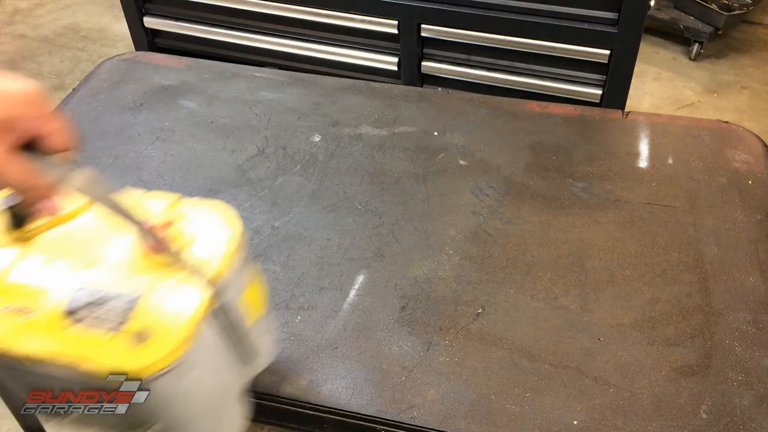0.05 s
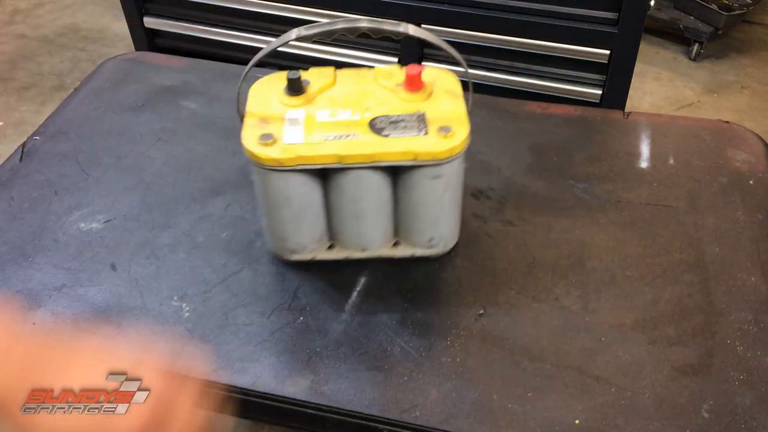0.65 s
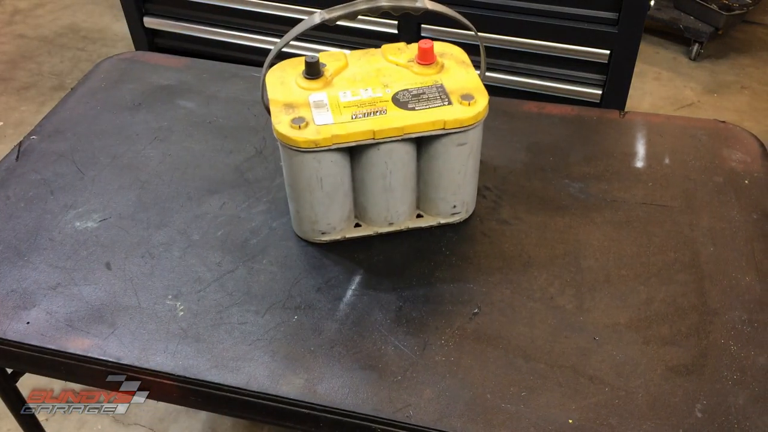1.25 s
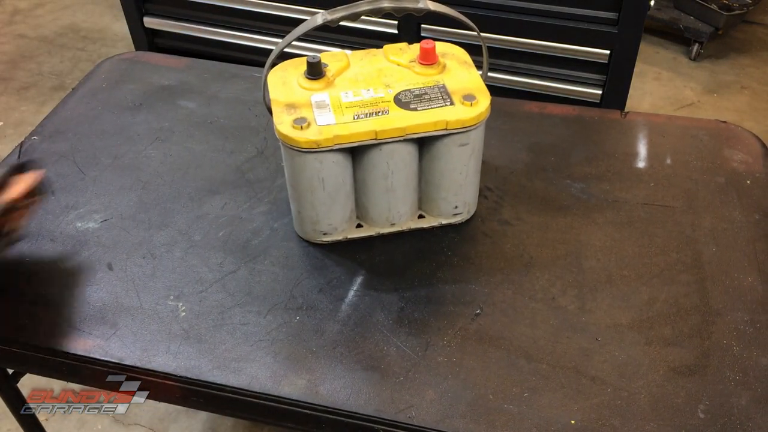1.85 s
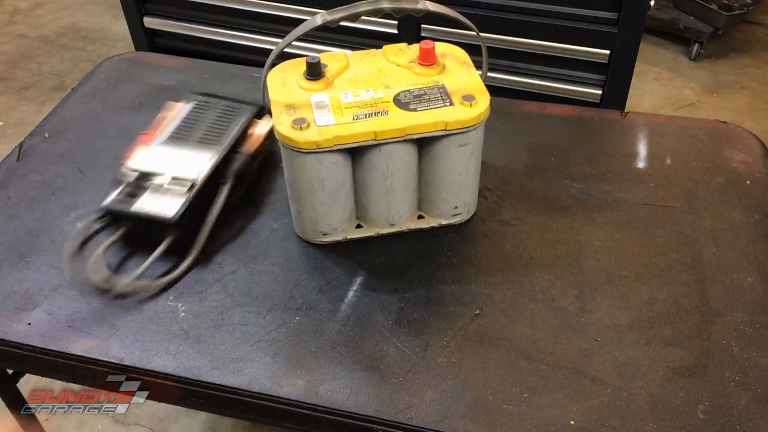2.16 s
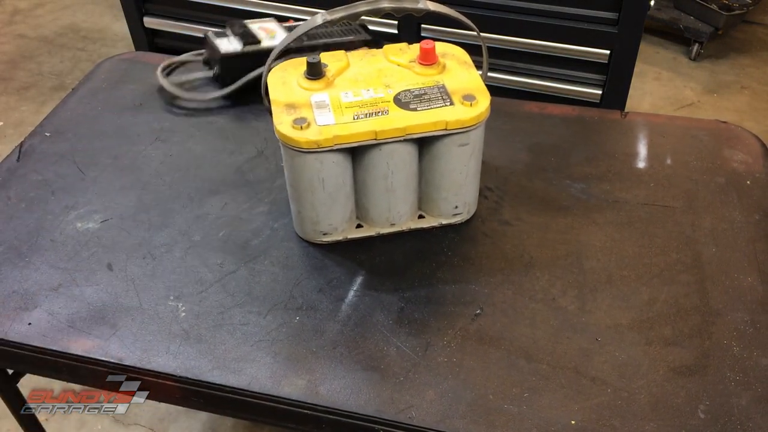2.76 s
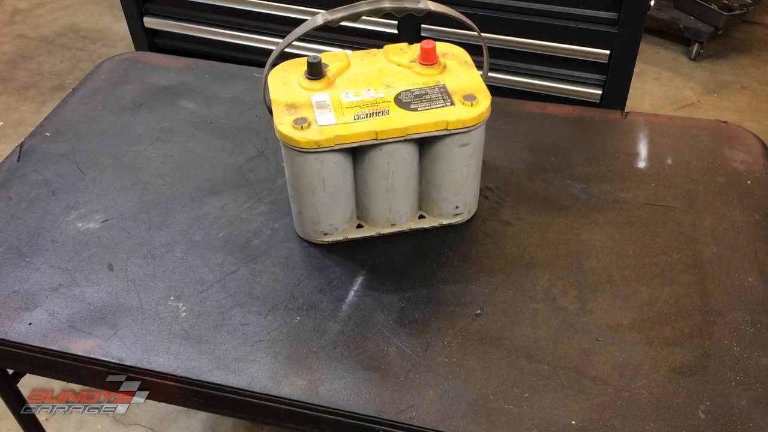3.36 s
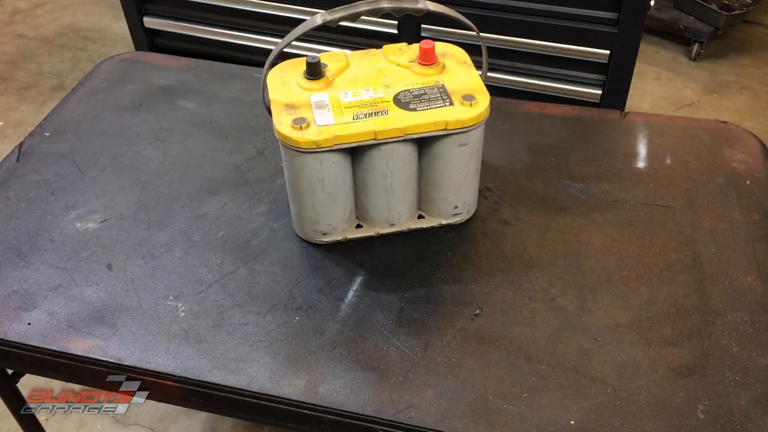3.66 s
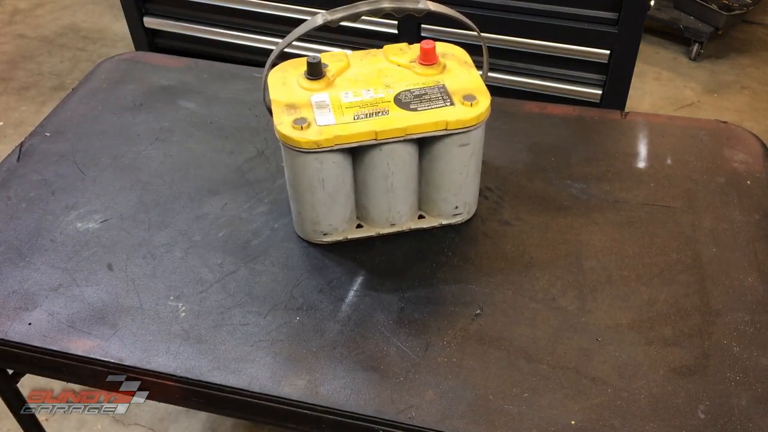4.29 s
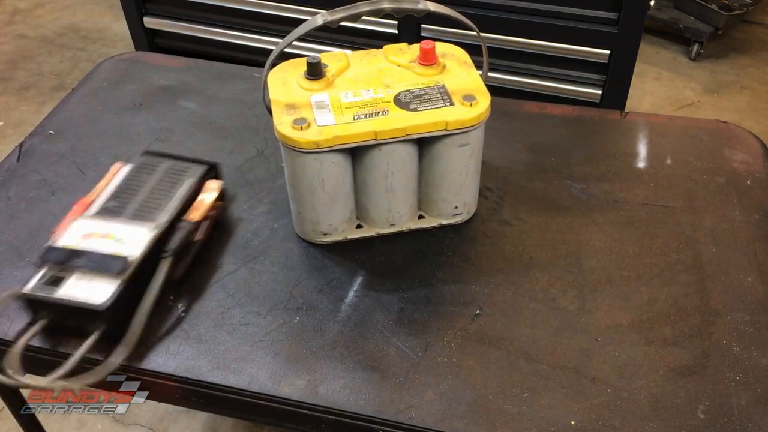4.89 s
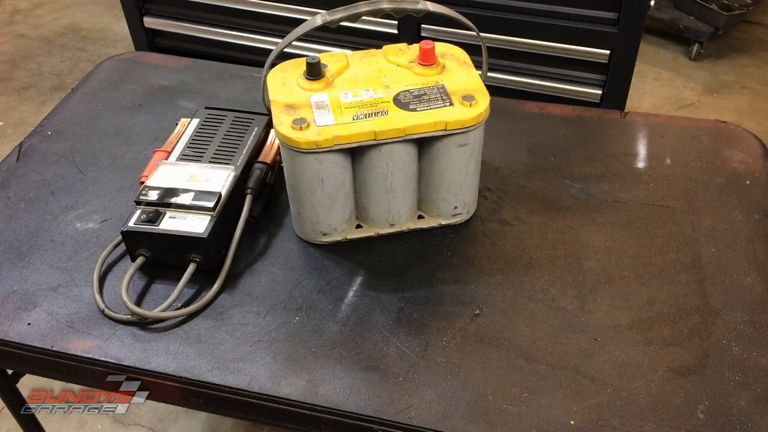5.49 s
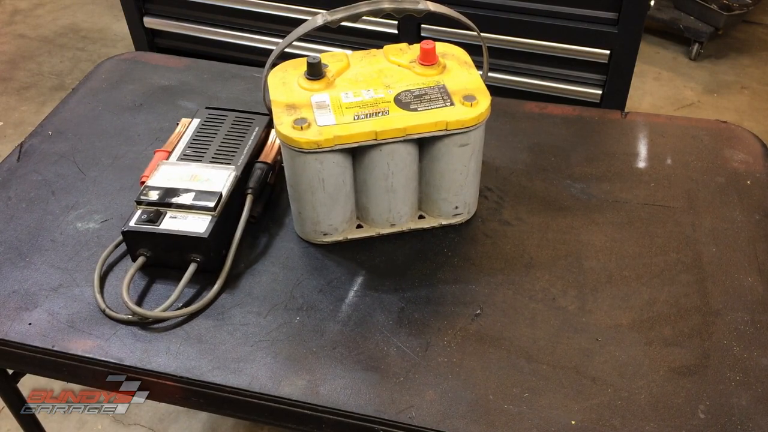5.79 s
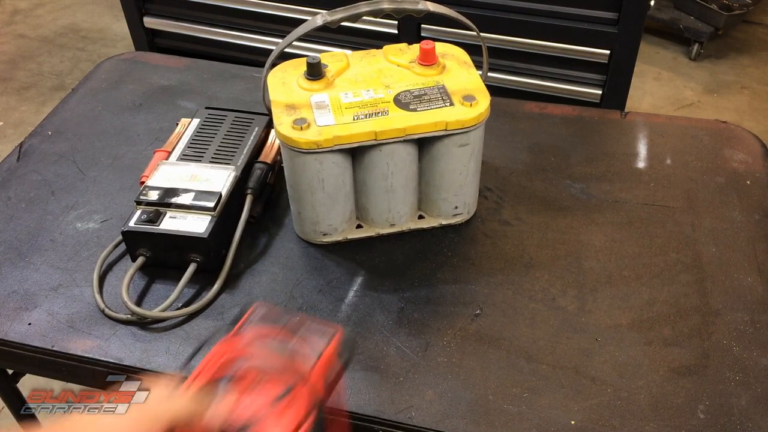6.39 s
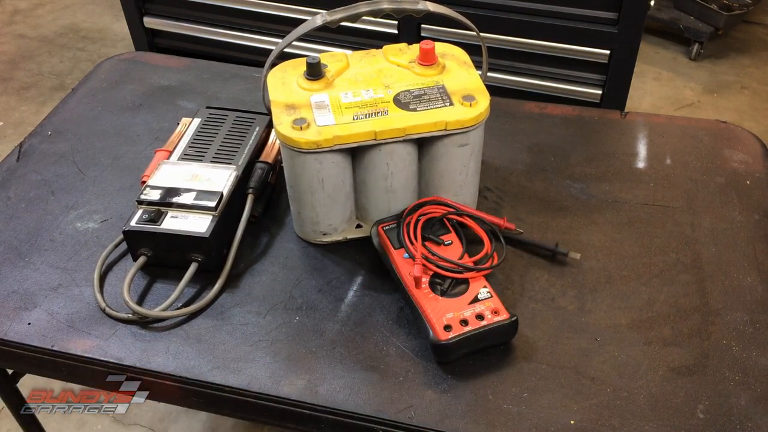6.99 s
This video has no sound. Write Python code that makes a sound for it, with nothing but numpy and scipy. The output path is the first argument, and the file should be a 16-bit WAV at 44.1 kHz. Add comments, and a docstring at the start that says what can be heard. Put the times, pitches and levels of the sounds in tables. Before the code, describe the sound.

A car battery thuds onto a steel table, a metal tester skids off and crashes onto concrete, then more tools clunk down.

```python
"""A car battery is dumped on a steel table in a garage, where it rocks and scrapes to rest.
A sheet-metal battery tester is thrown after it, skids over the edge and crashes on the concrete floor.
The tester lands on the table again, then a rubber-cased multimeter. Hits ring the steel top and frame
and click in the cases; slides judder by stick-slip. Sleeve and leads swish over faint room air.
The near microphone is driven to its limit."""
import sys
import numpy as np
from scipy import signal
from scipy.fft import rfft, irfft, next_fast_len
from scipy.io import wavfile

SR = 44100
rng = np.random.default_rng(int(sys.argv[2]) if len(sys.argv) > 2 else 0)


def store_wav(level_fs):
    """Save 16-bit WAV to argv[1]."""
    pcm = np.round(np.clip(np.atleast_2d(level_fs), -1, 1) * 32767)
    wavfile.write(sys.argv[1], SR, pcm.T.astype(np.int16))


N = 314874
AGE_S = np.arange(3 * SR // 2) / SR  # time since a hit

# Table contacts; flat landings shake the frame, corners do not: start_s, object, strength_db, flatness_db
TABLE_HITS = [ (0.246, "battery", -15.5, 6), (0.283, "battery", -12, -10.5), (0.299, "battery", -9.5, 1.5),
              (0.393, "battery", -22, -4.5), (0.455, "battery", -14, 6), (0.544, "battery", -19.5, 5.5),
              (0.588, "battery", -14, 1.5), (0.673, "battery", -18.5, 3.5), (0.725, "battery", -15, 5),
              (0.822, "battery", -16, 1.5), (1.073, "battery", -27.5, 2.5), (1.173, "battery", -27.5, 7),
              (1.354, "battery", -50, 10.5), (1.637, "battery", -49, -4), (2.061, "tester", -8, 8),
              (2.103, "tester", -1, -6), (2.261, "tester", -9.5, 0.5), (2.337, "tester", -17, -0.5),
              (2.381, "tester", -15, 8.5), (2.713, "tester", -27.5, 7.5), (2.873, "tester", -34, 11),
              (3.001, "tester", -35, 6), (4.821, "tester", -12, 4.5), (4.878, "tester", -4.5, -3.5),
              (4.890, "tester", -6, 0.5), (4.939, "tester", -17.5, 11.5), (5.034, "tester", -19.5, 6.5),
              (5.307, "tester", -26, -36.5), (5.324, "tester", -33.5, 4), (5.880, "tester", -49.5, -1),
              (6.594, "meter", -24.5, -3), (6.676, "meter", -3, -6.5), (6.822, "meter", -21, -32),
              (6.838, "meter", -30, 14.5), (6.911, "meter", -20.5, -28), (7.004, "meter", -35, -43)]
# Tester and clamps on concrete: start_s, body_db, clash_db, boom_db
FLOOR_HITS = [(3.262,-8,-10,-19.5), (3.268,-3.5,-6.5,-11.5), (3.316,-4,-4.5,-24.5), (3.364,-9.5,-20,-22),
              (3.536,-17.5,-27,-31.5), (3.812,-38.5,-48.5,-51), (3.943,-17,-27,-57), (3.976,-6.5,-8,-31.5),
              (4.057,-12,-19,-61)]
# Slides on the top: start_s, length_s, judder_db, scrape_db
SLIDES = [(0.302, 0.82, -21, -33), (2.28, 0.79, -25.5, -43), (4.905, 0.46, -23, -41.5),
          (6.72, 0.36, -25, -47)]
# Battery handle and meter probes: start_s, level_db
TICKS = [(0.282, -31), (0.456, -22), (0.589, -24), (0.822, -32), (6.912, -33), (7.006, -40.5)]
# Arm swings: start_s, length_s, level_db
SWINGS = [(1.335, 0.114, -62.5), (1.523, 0.18, -67), (1.928, 0.12, -60), (4.58, 0.22, -47.5),
          (5.61, 0.354, -61.5), (6.05, 0.178, -60.5), (6.36, .3, -51)]
# Case click at full strength: object, level_db
CLICK_DB = {"battery": -19.5, "tester": -10.5, "meter": -17.5}

# Modes of whole table, steel top, tester shell with clamps, battery handle: pitch_hz, level_db, t60_s
TABLE_MODES = [(59.5, -5, 0.88), (57.3, -9, 0.62), (77.6, -14, 0.13), (89.3, -1.5, 0.61), (97.5, 0.5, 0.94),
               (103, -6, 0.32), (145.2, -12.5, 1.3), (166.5, -11.5, 0.75), (177.8, -9, 0.85),
               (240.2, -12.5, 0.31)]
TOP_MODES = [(307, -9, 1), (350, 1, 0.26), (416.2, 3, 0.54), (659, -6.5, 1), (816, -7, 0.71),
             (961, -3, .55), (1029, 0.5, 0.23), (1096, -11, 0.64), (1990, -12.5, 0.4)]
SHELL_MODES = [(7196, -4, .3), (7299, -4, .3), (7750, -5, .3), (8107, -2, .3), (8433, -5, .3),
               (8639, -2, .3), (9116, -5, .3), (10525, -3, .3), (11633, -6, .3)]
HANDLE_MODES = [(4170, -11, 1.0), (4240, -11, 1.0), (4312, -11, 1.0), (4800, -2, .25), (5570, -11, .7),
                (5650, -11, .7)]

# Knock spectrum of each object on the top: freq_hz, density_db
BATTERY = [(60, -28.5), (150, -2.5), (340, 2), (500, 0.5), (750, -2), (930, 0.5), (1090, -3.5),
           (1300, -9.5), (1900, -15), (2600, -23.5), (5000, -26.5), (9000, -28), (16000, -56)]
TESTER = [(60, -25.5), (160, 2.5), (400, 0), (480, 0.5), (680, 3), (1060, -0.5), (1400, -8), (1900, -10.5),
          (2500, -20.5), (3300, -19), (5000, -31), (9000, -36.5), (16000, -57)]
METER = [(60, -29.5), (170, 12), (270, -8), (410, 5.5), (560, 2), (850, 2.5), (1100, 3), (1400, -4.5),
         (2000, -14), (3400, -21), (5000, -32.5), (9000, -26), (16000, -48.5)]
# Lookup: object, spectrum
KNOCK_SPECTRA = {"battery": BATTERY, "tester": TESTER, "meter": METER}

# Noise spectra: freq_hz, density_db
FRAME_SPECTRUM = [(5, -56.5), (22, -15.5), (40, -10), (60, 3), (90, -0.5), (125, -5), (170, -5.5),
                  (230, -12.5), (320, -14), (500, -30.5), (1500, -68)]
TOP_SPECTRUM = [(60, -20), (150, 3.5), (380, 10.5), (520, 13.5), (750, 7), (1080, -0.5), (1400, 2.5),
                (1900, -6.5), (2500, -19), (3400, -26), (5000, -33), (9000, -31.5), (16000, -59)]
CASE_SPECTRUM = [(500, -38.5), (2000, -4), (3300, -5.5), (5000, -8), (8300, 1), (10500, 0), (13000, -7),
                 (16000, -19.5)]
CRASH_BODY_SPECTRUM = [(25, -41.5), (100, -23), (220, -6.5), (400, 2), (650, 5), (1100, 0.5), (1400, -6),
                       (1700, -2), (2400, -12), (3500, -12), (5000, -15.5), (9000, -27.5), (16000, -43)]
CRASH_BOOM_SPECTRUM = [(5, -65), (25, -8.5), (60, -0.5), (120, -2), (210, 1.5), (320, -11), (600, -29.5),
                       (1500, -67.5)]
SCRAPE_SPECTRUM = [(800, -5), (2500, 5.5), (5000, -8.5), (9000, 0.5), (11500, -7.5), (13500, -18),
                   (16000, -20.5)]
SWISH_SPECTRUM = [(180, -13), (300, -0.5), (800, -1), (1800, 1), (2500, -0.5), (3600, -2), (4500, -6.5),
                  (6700, -6.5), (10500, -1.5), (14000, -9), (16000, -21.5)]
AIR_SPECTRUM = [(20, 5), (70, -4.5), (200, -15.5), (1000, -29), (4000, -38), (12000, -34), (16000, -44)]

# Decay of steel plus garage, and of the garage alone: freq_hz, t60_s
STEEL_DECAY = [(60, 0.66), (200, 1), (700, 0.62), (1500, 0.73), (4000, 0.79), (9000, 0.38), (15000, 0.14)]
GARAGE_DECAY = [(60, 1), (200, 0.5), (700, 0.49), (1500, 0.49), (4000, 0.48), (9000, 0.31), (15000, 0.27)]


def table_hits():
    """Each contact rocks the frame, knocks on the steel top and clicks in the object's case."""
    out = np.zeros(N)
    frame, top = modes(TABLE_MODES), modes(TOP_MODES)
    contact = onset(tau_s=0.0012)
    for start_s, thing, strength_db, flatness_db in TABLE_HITS:
        thud_db = strength_db + flatness_db
        # Click grows faster than knock; flat landings muffle it.
        click_db = CLICK_DB[thing] + 1.415 * strength_db - 0.14 * flatness_db
        thud = amp(-10.5) * ring(frame, scatter_db=6.5)
        thud += amp(-10.5) * wash(FRAME_SPECTRUM, STEEL_DECAY) * (amp(-1) + fade(0.21))
        steel = wash(KNOCK_SPECTRA[thing], STEEL_DECAY) + amp(-14) * ring(top, scatter_db=6.5)
        knock = steel * (amp(-13) + amp(-8) * fade(0.22))  # ringing + direct sound
        click = wash(CASE_SPECTRUM, STEEL_DECAY)
        click *= amp(-11) + amp(-3) * fade(0.16) + amp(2) * fade(0.007)
        hit = amp(thud_db) * thud + amp(strength_db) * knock + amp(click_db) * click
        add(out, start_s, contact * hit)
    return out


def floor_hits():
    """The tester's shell crashes behind the table, heard mostly off the walls."""
    out = np.zeros(N)
    shell = modes(SHELL_MODES)
    reflections = onset(tau_s=0.004)
    for start_s, body_db, clash_db, boom_db in FLOOR_HITS:
        body = wash(CRASH_BODY_SPECTRUM, GARAGE_DECAY) * (amp(-8.5) + amp(-26.5) * fade(0.44))
        clash = wash(CASE_SPECTRUM, GARAGE_DECAY) * (amp(-9) + amp(-11.5) * fade(1.0))
        clash += amp(-24.5) * ring(shell, scatter_db=3)
        boom = amp(-6.5) * wash(CRASH_BOOM_SPECTRUM, GARAGE_DECAY)
        crash = amp(body_db) * body + amp(clash_db) * clash + amp(boom_db) * boom
        add(out, start_s, reflections * crash)
    return out


def slides():
    """Stick-slip shakes top and frame; grit scratches under the object."""
    judder, scrape = friction()
    slips = grains(rate_hz=240, spread_db=0.5)
    top_ir = wash(TOP_SPECTRUM, STEEL_DECAY) * fade(0.15)
    top_ir += amp(-13.5) * ring(modes(TOP_MODES), scatter_db=2) * fade(0.43)
    frame_ir = ring(modes(TABLE_MODES), scatter_db=-1) * fade(0.34)
    frame_ir += amp(-5) * wash(FRAME_SPECTRUM, STEEL_DECAY) * fade(0.12)
    contact = onset(tau_s=0.002)
    top, frame = [unit_rms(signal.fftconvolve(slips, contact * ir)[:N]) for ir in (top_ir, frame_ir)]
    grit = colour(grains(rate_hz=30000, spread_db=1), SCRAPE_SPECTRUM)
    return judder * (amp(-2.5) * top + amp(-4) * frame) + amp(-4.5) * scrape * grit


def friction():
    """Judder and scrape gains: both fall with speed as friction brakes the object evenly."""
    judder, scrape = np.zeros((2, N))
    for start_s, length_s, judder_db, scrape_db in SLIDES:
        speed = stroke(start_s, length_s, rise_s=0.01, fall_s=length_s)
        judder += amp(judder_db) * speed ** 1.11
        scrape += amp(scrape_db) * speed
    return judder, scrape


def ticks():
    """Plastic parts snap against their cases, too light to ring the table."""
    out = np.zeros(N)
    for start_s, level_db in TICKS:
        add(out, start_s, amp(level_db) * noise(CASE_SPECTRUM, len(AGE_S)) * fade(t60_s=0.013))
    return out


def handle(start_s=0.822):
    """The battery's carrying handle rings as it swings to its stop."""
    out = np.zeros(N)
    add(out, start_s, amp(-47) * ring(modes(HANDLE_MODES), scatter_db=2))
    return out


def swishes():
    """Sleeve and leads brush as the arm moves."""
    gain = sum(amp(level_db) * stroke(start_s, length_s, rise_s=0.043, fall_s=0.11)
               for start_s, length_s, level_db in SWINGS)
    return gain * noise(SWISH_SPECTRUM, N)


def room_air():
    """Still garage air: faint, steady, mostly low noise."""
    return amp(-58) * noise(AIR_SPECTRUM, N)


def modes(rows):
    """One decaying sine per mode, signs alternating."""
    return np.array([(-1) ** k * amp(level_db) * fade(t60_s) * np.sin(2 * np.pi * pitch_hz * AGE_S)
                     for k, (pitch_hz, level_db, t60_s) in enumerate(rows)])


def ring(sines, scatter_db):
    """Modes summed at random strengths, as each contact point excites them differently."""
    return amp(scatter_db * rng.standard_normal(len(sines))) @ sines


def wash(spectrum, decay):
    """Dense overlapping modes: noise with a decay time per band."""
    freq_hz, time_s, bands = signal.stft(noise(spectrum, len(AGE_S)), SR, nperseg=256)
    bands *= np.exp(-np.log(1000) * time_s / log_interp(decay, freq_hz)[:, None])
    return signal.istft(bands, SR, nperseg=256)[1][:len(AGE_S)]


def grains(rate_hz, spread_db):
    """Tiny random slips of uneven size."""
    slipping = rng.random(N) < rate_hz / SR
    return slipping * rng.standard_normal(N) * amp(spread_db * rng.standard_normal(N))


def noise(spectrum, samples):
    """Coloured noise, rms 1."""
    return colour(rng.standard_normal(samples), spectrum)


def colour(x, spectrum):
    """x shaped by a spectrum, rms 1."""
    size = next_fast_len(len(x))
    gain = amp(log_interp(spectrum, np.fft.rfftfreq(size, 1 / SR)))
    return unit_rms(irfft(rfft(x, size) * gain, size)[:len(x)])


def log_interp(points, freq_hz):
    """Curve value on a log frequency axis."""
    knots_hz, values = np.transpose(points)
    return np.interp(np.log(freq_hz + 1), np.log(knots_hz + 1), values)


def stroke(start_s, length_s, rise_s, fall_s):
    """Linear rise and fall, capped at 1."""
    age_s = np.arange(N) / SR - start_s
    return np.clip(np.minimum(age_s / rise_s, (length_s - age_s) / fall_s), 0, 1)


def onset(tau_s):
    """Exponential rise to 1."""
    return 1 - np.exp(-AGE_S / tau_s)


def fade(t60_s):
    """Decay of 60 dB in t60_s."""
    return np.exp(-np.log(1000) * AGE_S / t60_s)


def amp(db):
    """Decibels to gain."""
    return 10 ** (np.asarray(db) / 20)


def unit_rms(x):
    """x at rms 1."""
    return x / np.sqrt(np.mean(x ** 2) + 1e-20)


def add(track, start_s, sound):
    """Mix a sound into the track."""
    part = track[round(start_s * SR):][:len(sound)]
    part += sound[:len(part)]


def scene():
    """All sources over the room air, mono."""
    air = room_air()
    return (table_hits() + handle() + ticks() + floor_hits() + slides() + swishes() + air)[None]


def record(dry):
    """Microphone overload rounds the peaks; a brick-wall low-pass follows."""
    hardness, cutoff_hz = 5, 15900
    rounded = dry / (1 + np.abs(dry) ** hardness) ** (1 / hardness)
    size = next_fast_len(N + SR // 2)
    passband = np.fft.rfftfreq(size, 1 / SR) < cutoff_hz
    return irfft(rfft(rounded, size) * passband, size)[..., :N]


dry = scene()
out = record(dry)
store_wav(out)
```